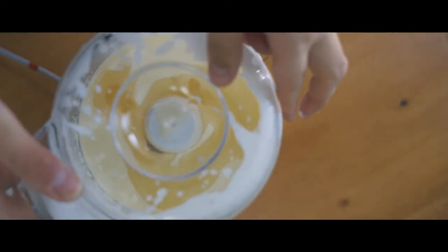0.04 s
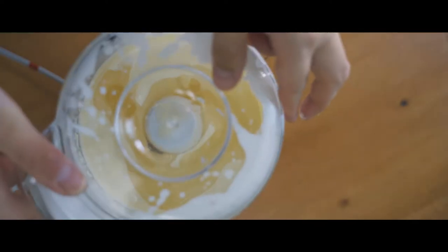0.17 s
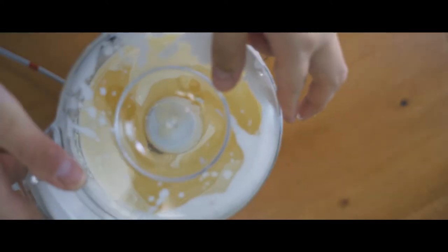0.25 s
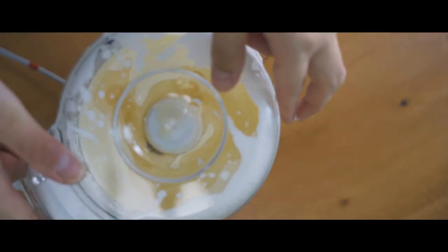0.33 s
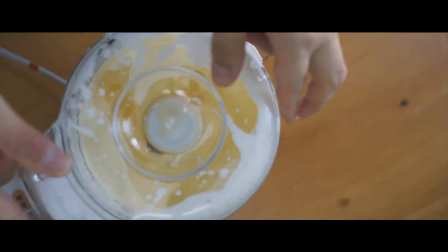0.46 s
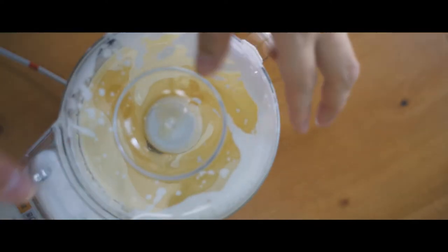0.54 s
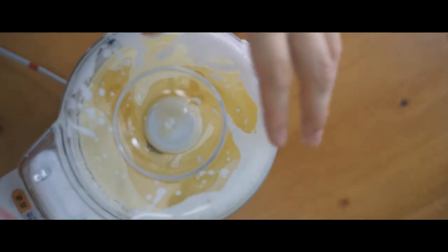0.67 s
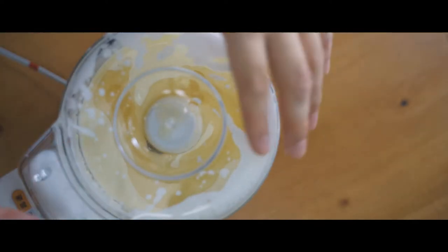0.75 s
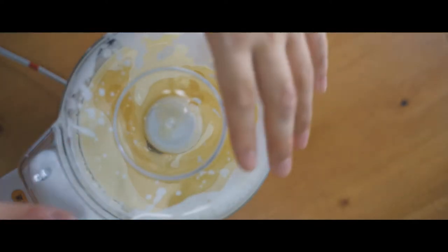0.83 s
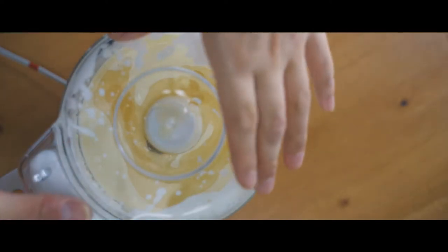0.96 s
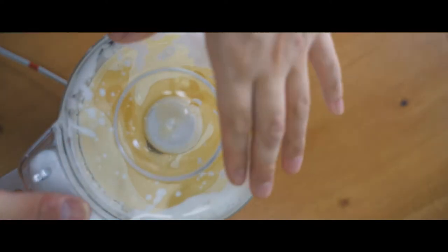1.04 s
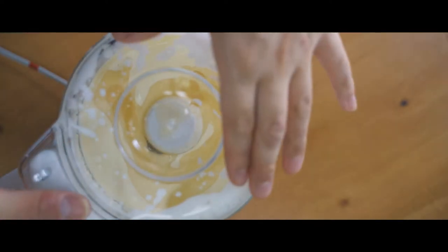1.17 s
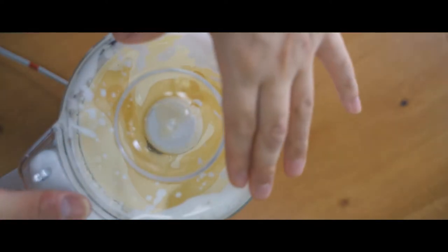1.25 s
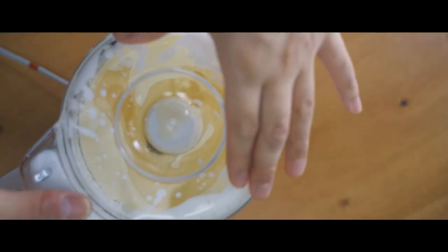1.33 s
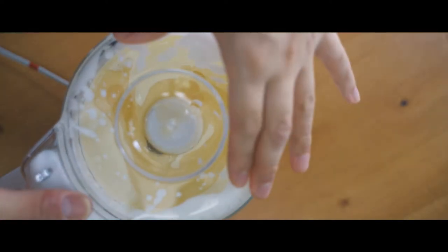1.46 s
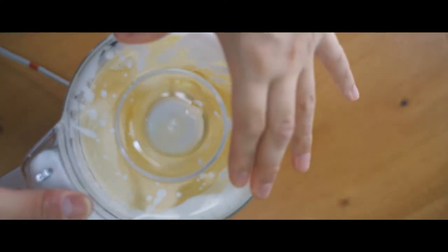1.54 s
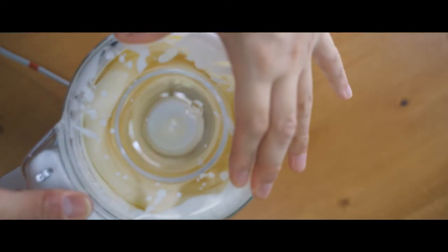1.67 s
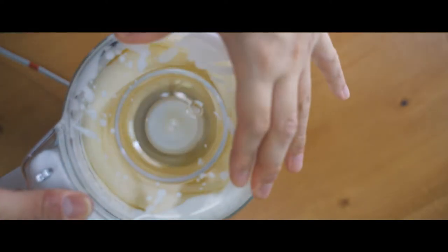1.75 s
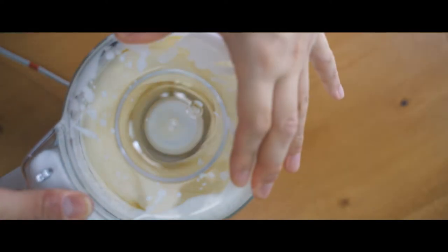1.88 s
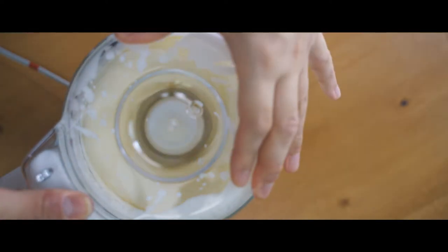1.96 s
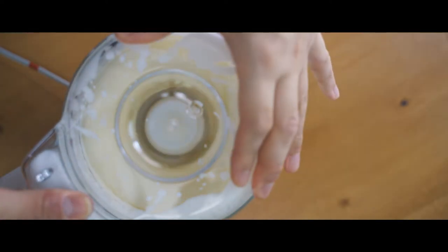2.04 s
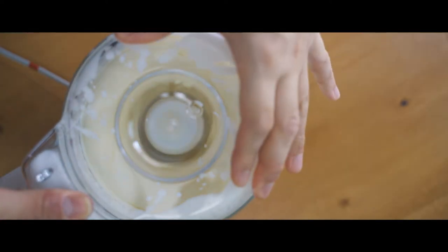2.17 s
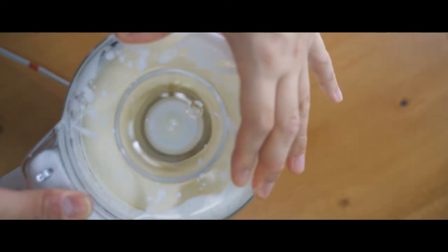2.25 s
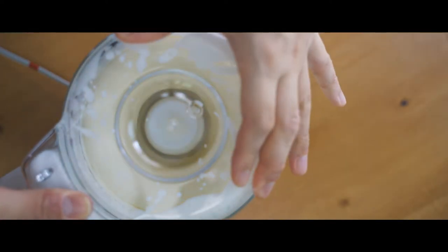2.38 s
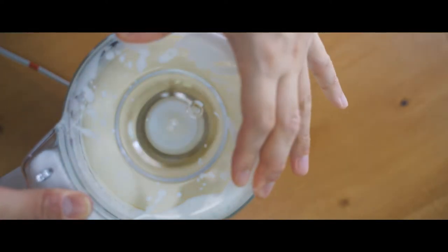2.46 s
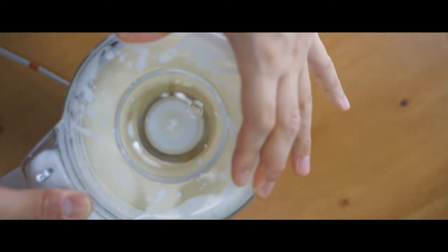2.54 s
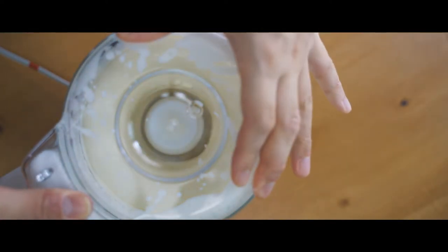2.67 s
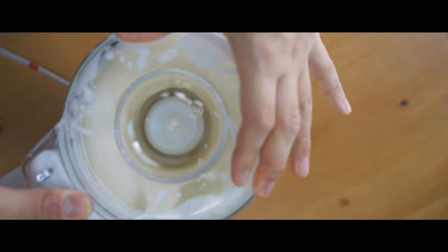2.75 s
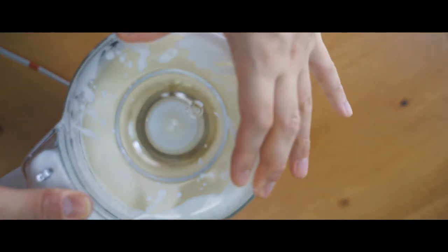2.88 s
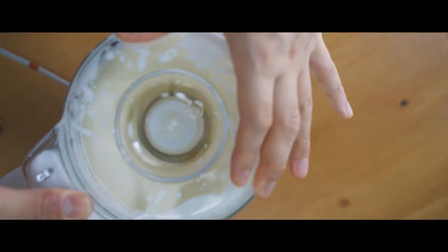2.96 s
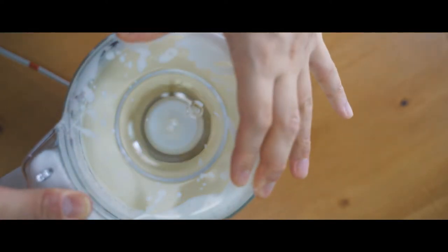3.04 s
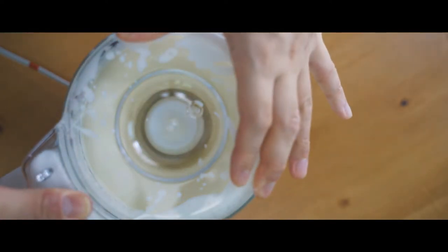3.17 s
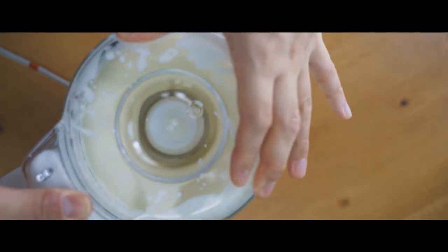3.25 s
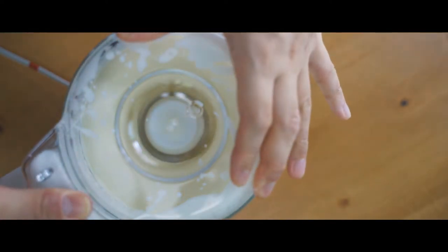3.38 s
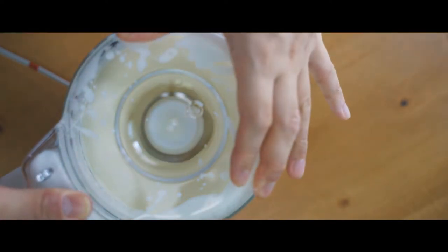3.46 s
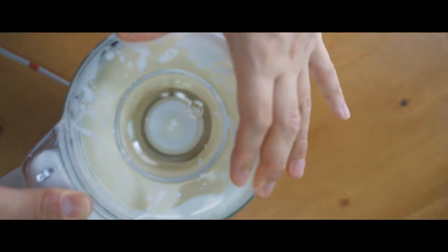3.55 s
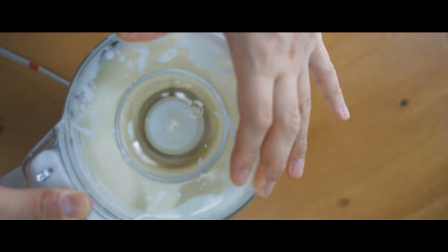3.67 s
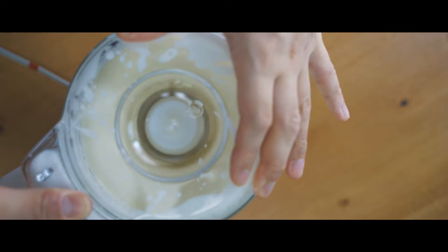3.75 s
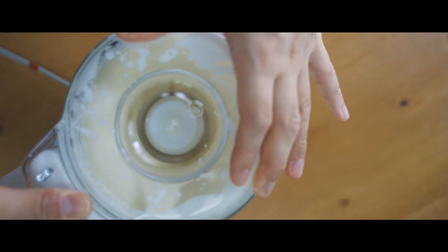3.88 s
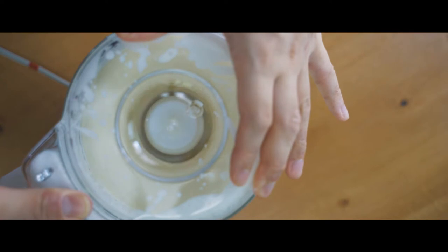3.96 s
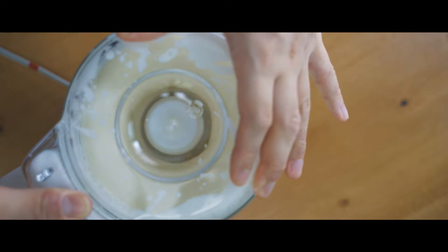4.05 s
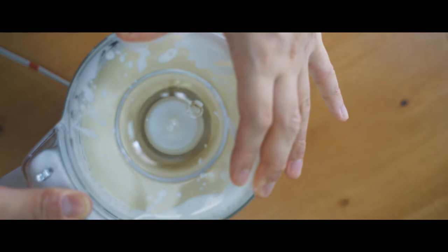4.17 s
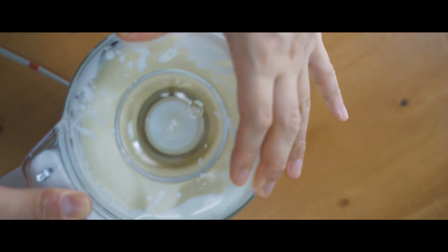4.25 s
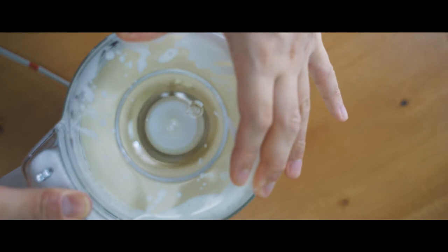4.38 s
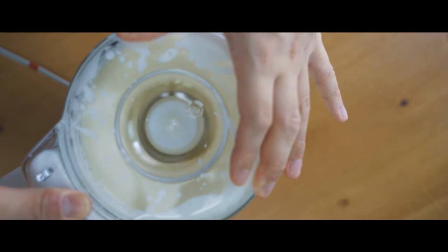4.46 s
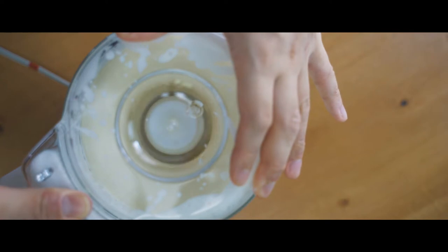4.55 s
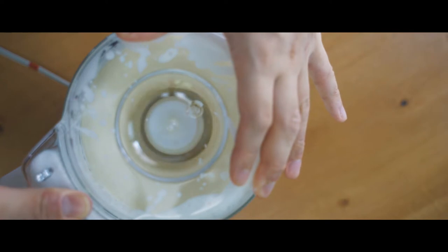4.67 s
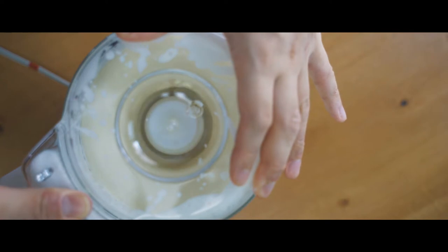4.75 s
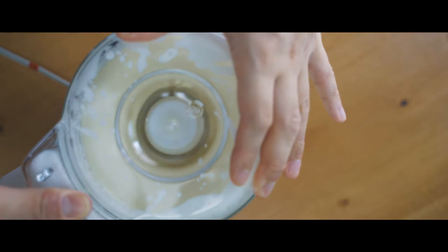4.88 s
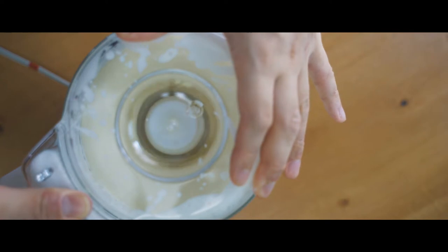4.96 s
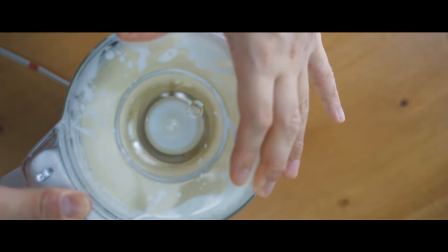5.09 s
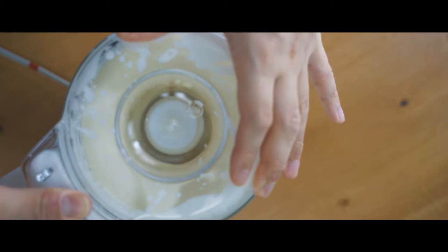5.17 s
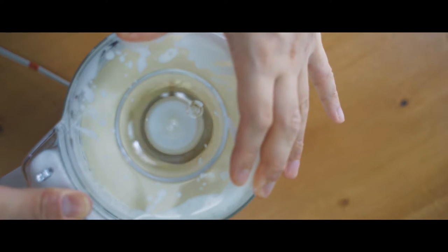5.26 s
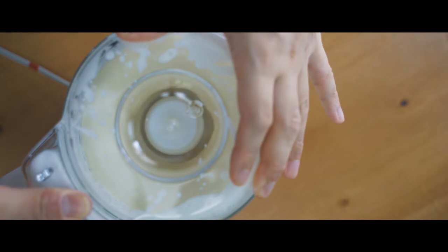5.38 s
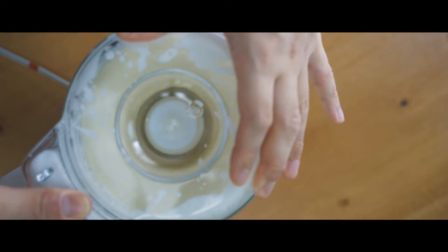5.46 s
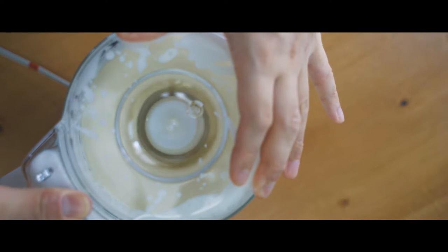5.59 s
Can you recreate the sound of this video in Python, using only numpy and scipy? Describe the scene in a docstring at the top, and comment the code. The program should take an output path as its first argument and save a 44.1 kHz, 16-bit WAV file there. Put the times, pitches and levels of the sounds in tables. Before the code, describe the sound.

Near stereo pickup of plastic and motor in a small, lightly reflective room. First soft taps and short rasping rubs, then a dense clatter as the lid twists home. Near-quiet follows, with a few light ticks. A firm click starts the machine: a thump of hum, a gritty surge, then a hard nasal whine with fast electrical buzz, brushy hiss and wet rattling churn, running without a stop.

```python
"""Food processor on a kitchen table

Heard by two microphones just above: the lid rubs and knocks as it is twisted to its latch, then the motor starts.
Fed one half of each mains cycle, it throbs fifty times a second: rotor tones whine, shaped noise rattles and hisses.
It spins up quickly, then gains speed slowly as the batter thins; mains harmonics make the stator's hum.
A small room answers with sparse reflections over still air and a low hum; struck plastic is decaying sines and noise."""
import sys
import numpy as np
from scipy import signal
from scipy.fft import rfft, irfft
from scipy.io import wavfile

SR = 44100
rng = np.random.default_rng(int(sys.argv[2]) if len(sys.argv) > 2 else 0)


def materialize(psi):
    """Save the field psi as 16-bit PCM at rate SR to the path in sys.argv[1].

    A 1-D psi becomes a single channel; in a 2-D psi each row is a channel.
    """
    bounded = np.clip(np.atleast_2d(psi).T, -1, 1)
    quanta = np.round(bounded * 32767).astype(np.int16)
    wavfile.write(sys.argv[1], SR, quanta)


N = 247842
TIME = np.arange(N) / SR  # s
BINS = np.fft.rfftfreq(N, 1 / SR)  # Hz

# Still air of the quiet kitchen. Each row: frequency in Hz, relative density in dB per Hz.
AIR_SPECTRUM = [(15, -44), (25, -19), (69, -15.5), (122, -6.5), (215, -9), (233, 0), (281, -1.5),
                (331, -22), (368, 2.5), (410, -19.5), (567, -13), (684, -20), (741, -15), (2300, -31),
                (15500, -44.5)]
# Faint hum of the kitchen. Each row: frequency in Hz, peak level in dB.
ROOM_HUM_TONES = [(279.9, -60), (371.4, -68.5), (559.9, -69.5), (737.5, -81.5)]
# Decay of the kitchen. Each row: frequency in Hz, time to fall 60 dB in s.
ROOM_DECAY = [(150, 0.19), (1000, 0.25), (4000, 0.2), (14000, 0.16)]
# Likeness of the noise at the two microphones. Each row: frequency in Hz, likeness 0-1.
MICROPHONE_LIKENESS = [(105, .99), (160, .1), (300, .55), (500, .85), (800, .8), (2000, .4), (5000, .15),
                       (12000, .05)]
# The lid rubbing round its rim. Each row: start in s, length in s, level in dB before the grip shapes it,
# lid mode rubbed hardest in Hz.
LID_RUBS = [(0.039, 0.099, -60.5, 970), (0.383, 0.16, -47, 4480), (0.447, 0.12, -38, 1720)]
# Ring of the plastic lid. Each row: mode in Hz, level in dB before a touch favours it, time to fall 60 dB in s.
LID_MODES = [(610, -13, 0.089), (944, -6.5, 0.14), (1000, -5.5, 0.064), (1628, -5.5, 0.069),
             (1716, 2.5, 0.049), (2100, 4, 0.015), (2446, -5.5, 0.044), (2900, -19, 0.024),
             (3660, -27, 0.038), (3970, -3, 0.032), (4240, 1, 0.027), (4530, -2, 0.038), (4840, -8, .04),
             (5220, -10.5, 0.059), (6780, -7, .05), (7500, -27, 0.055)]
# Knocks of lid, latch, switch and lumps. Each row: start in s, hollow pitch in Hz, relative levels in dB of the
# hollow note, mid ring, crack and edge, lid mode struck hardest in Hz.
KNOCK_EVENTS = [(.157, 424, -34, -36, -40, -52.5, 940), (.297, 372, -51.5, -56, -55, -71, 4180),
                (0.369, 533, -43, -29.5, -37, -62, 1630), (.400, 261, -42.5, -34.5, -35, -62, 2100),
                (.418, 280, -53, -60, -46, -51, 4480), (0.4419, 252, -42, -38.5, -45, -56, 2130),
                (.456, 254, -34.5, -33, -31, -52, 4180), (.553, 250, -39, -43.5, -62, -72, 990),
                (1.273, 225, -54, -57, -46, -54, 3750), (1.282, 275, -51, -53, -46, -50, 6000),
                (1.346, 287, -53, -56, -56, -62, 1900), (1.54, 440, -46, -30, -48, -59, 2120),
                (1.551, 455, -36, -33, -42, -71, 1720), (1.785, 660, -45.5, -44, -48, -64, 1630),
                (1.936, 443, -52, -54, -43.5, -68, 5220), (2.112, 440, -62, -46, -45, -62, 5220)]
# Tones of the rotor. Each row: multiple of the shaft speed (rounded in use), relative level in dB,
# share that throbs 0-1, place of the throb in mains cycles, roughness 0-1, left over right in dB.
ROTOR_TONES = [(6, -17, 0.69, 0.44, 0.35, 6), (20, -13.5, 0.37, 0.39, 0.64, 2),
               (24, -3, 0.98, 0.16, 0.04, 3), (29, -21.5, 0.6, 0.39, 0.6, -9),
               (30, -26.5, 0.6, .2, 0.54, 19.5), (48, -10, 0.9, 0.18, 0.26, 5.5),
               (72.2, -18, 0.64, 0.036, 0.43, 0), (96, -19.5, 0.1, 0.85, 0.2, -0.5),
               (120.6, -26, 0, 0.09, .8, -1.5), (145.4, -36.5, 0.1, .1, 0.85, -5),
               (192, -31, .2, .1, 0.95, 3)]
# Resonances of housing and bowl, which swell the whine as it climbs through them.
# Each row: frequency in Hz, width in Hz, level in dB over the plain wall.
HOUSING_MODES = [(370, 56, 5), (451.5, 11, 4), (536, 59, 5.5), (735, 31, 2), (1022.3, 14, 8.5),
                 (1568.5, 17, 6), (1698.6, 27.5, 3.5), (1848, 99, 5), (2060, 39, -3), (2490, 134, -6),
                 (3294, 12, -6), (3344, 12, -2), (3380, 14, -3), (3505, 12, 3.5), (5141, 60, 0),
                 (5320, 20, -1)]
# Hum of the stator once settled. Each row: multiple of the mains, rms level in dB.
STATOR_HUM = [(1, -90), (2, -54), (3, -62.5), (4, -62.5), (5, -65.5), (6, -52.5), (7, -57), (8, -58.5),
              (9, -50.5), (11, -57), (12, -55.5), (13, -70.5), (15, -59.5)]
# The drive grinding as it takes up the load. Each row: frequency in Hz, relative density in dB per Hz.
GRIND_SPECTRUM = [(45, -25), (85, 2), (140, 2), (250, 5), (450, -6), (900, -8), (1300, 0), (2000, 7.5),
                  (2500, -1), (3100, -7), (3700, -2.5), (4300, -7.5), (5200, -18), (16000, -57)]
# Gears and blade in the batter, before the housing. Each row: frequency in Hz, relative density in dB per Hz.
CHURN_SPECTRUM = [(25, -34), (68, -31), (95, -23), (170, -24), (270, -7), (400, 0.5), (560, -6), (660, -5),
                  (1000, 0), (1400, -10.5), (2200, -11), (4000, -17.5), (16000, -49)]
# Brushes and cooling air, before the housing. Each row: frequency in Hz, relative density in dB per Hz.
BRUSH_SPECTRUM = [(200, 6.5), (900, 5), (1500, 23.5), (2000, 18), (2800, 7.5), (4400, 3), (5800, -1.5),
                  (6700, 5), (7600, -1), (9800, -2), (11000, -8.5), (12500, -7.5), (13400, -7), (15700, -8)]

MAINS_HZ = 50.04
SLOTS = 24  # rotor slots per turn
SWITCH_ON = 1.541  # s
# Slots pass at THICK_HZ in thick batter, reached with this time constant (s)
THICK_HZ, SPIN_UP_S = 1650, 0.097
# From THINS_AT (s) the batter thins; half the gain towards FREED_HZ is made after THINS_HALF_S
THINS_AT, THINS_HALF_S, FREED_HZ = 2.3, 1.55, 110


def gain_of(db):
    """Decibels to amplitude."""
    return 10 ** (np.asarray(db) / 20)


def evened(x):
    """Scales to rms 1."""
    return x / np.sqrt(np.mean(x ** 2) + 1e-20)


def read(points, hz):
    """Reads a curve whose points are joined on a log-frequency axis."""
    f, value = np.transpose(points)
    return np.interp(np.log(hz + 1), np.log(f + 1), value)


def panned(x, left_db):
    """Leans a sound to the left microphone."""
    return x * gain_of([[left_db / 2], [-left_db / 2]])


def wander(hz):
    """Smooth chance of rms 1, mostly below the given rate."""
    return evened(irfft(rfft(rng.standard_normal(N)) / (1 + (BINS / hz) ** 4), N))


def noise(spectrum):
    """Coloured noise at two microphones, most alike in the lowest bass."""
    left, other = rfft(rng.standard_normal((2, N)))
    same = read(MICROPHONE_LIKENESS, BINS)
    right = same * left + np.sqrt(1 - same ** 2) * other
    return evened(irfft(np.array([left, right]) * gain_of(read(spectrum, BINS)), N))


def band_passed(x, band):
    """Keeps one band (low Hz, high Hz)."""
    return signal.sosfilt(signal.butter(3, band, "bandpass", fs=SR, output="sos"), x)


def kitchen(x, wet_db):
    """Adds sparse reflections, different at each microphone, the top treble dying first."""
    taps = rng.standard_normal((2, SR // 2)) * (rng.random((2, SR // 2)) < 0.1)
    taps[:, :SR // 400] = 0  # no reflection in the first 2.5 ms
    hz, t, z = signal.stft(taps, SR, nperseg=256)
    decay = gain_of(-60 * t / read(ROOM_DECAY, hz)[:, None])
    tail = signal.istft(z * decay, SR, nperseg=256)[1]
    tail /= np.linalg.norm(tail, axis=1, keepdims=True)
    return x + gain_of(wet_db) * signal.fftconvolve(x, tail, axes=1)[:, :N]


def background(air_db=-49.5):
    """Still air as shaped noise, and a faint hum whose phase wavers."""
    tones = 0
    for hz, db in ROOM_HUM_TONES:
        tones = tones + gain_of(db) * np.cos(2 * np.pi * hz * TIME + 1.1 * wander(hz=4.5))
    return gain_of(air_db) * noise(AIR_SPECTRUM) + tones


def nearness(hz, touched_hz, spread=0.052):
    """How strongly a touch favours a mode of the lid, 0-1; spread is in log frequency."""
    return np.exp(-(np.log(hz / touched_hz) / spread) ** 2)


def twist(slips_per_s=1800, favour_db=7, grip_rise=0.015):
    """Tiny slips of plastic on plastic keep the lid ringing; each rub grips quickly and eases off."""
    out, t = np.zeros((2, N)), np.arange(SR // 8) / SR
    for start, length, rub_db, rubbed_hz in LID_RUBS:
        slips = rng.standard_normal((2, N)) * (rng.random(N) < slips_per_s / SR)
        ring = 0
        for hz, db, t60 in LID_MODES:
            level_db = db + favour_db * nearness(hz, rubbed_hz)
            ring = ring + gain_of(level_db - 60 * t / t60) * np.sin(2 * np.pi * hz * t)
        ringing = signal.oaconvolve(slips, ring[None])[:, :N]
        rasp = band_passed(slips, [1500, 8500])
        rub = evened(ringing) + evened(rasp)
        easing = np.clip(1 - (TIME - start) / length, 0, 1)
        grip = np.clip((TIME - start) / grip_rise, 0, 1) * easing
        out += gain_of(rub_db) * evened(rub) * grip
    return out


def lid_blow(t, struck_hz, crack_t60=0.065, crack_db=-1, snap_t60=0.018, snap_db=7, favour_db=9):
    """A blow sets off a noisy crack, a shorter snap of contact and the decaying modes of the lid."""
    crack = gain_of(crack_db - 60 * t / crack_t60) * rng.standard_normal((2, len(t)))
    snap = gain_of(snap_db - 60 * t / snap_t60) * rng.standard_normal((2, len(t)))
    ring = crack + snap
    for hz, db, t60 in LID_MODES:
        level_db = db + favour_db * nearness(hz, struck_hz)
        phase = rng.normal(0, 1.0, (2, 1))  # differs at each microphone
        ring += gain_of(level_db - 60 * t / t60) * np.sin(2 * np.pi * hz * t + phase)
    return ring


def knocks(hollow_t60=0.1, hollow_rise=0.003, contact=0.00082, knock_db=-0.5):
    """Each blow gives a hollow note of the bowl, a short crack and the ring of the lid, by where it lands."""
    out, t = np.zeros((2, N)), np.arange(SR // 4) / SR
    bands = [(500, 2900), (2900, 8500), (8500, 13000)]  # mid ring, crack and edge, Hz
    for start, hollow_hz, hollow_db, *band_dbs, struck_hz in KNOCK_EVENTS:
        ring = lid_blow(t, struck_hz)
        hollow = gain_of(-60 * t / hollow_t60) * np.sin(2 * np.pi * hollow_hz * t)
        hollow = hollow * np.minimum(t / hollow_rise, 1) * np.ones((2, 1))
        parts = [hollow] + [band_passed(ring, band) for band in bands]
        blow = 0
        for db, part in zip([hollow_db] + band_dbs, parts):
            blow = blow + gain_of(db) * part / np.std(part[:, :SR // 50])  # level over the first 20 ms
        first = round(start * SR)
        out[:, first:first + len(t)] += blow * np.minimum(t / contact, 1)
    return gain_of(knock_db) * out


def powered(rise):
    """Zero until the switch closes, then rising to one over the given seconds."""
    return np.clip((TIME - SWITCH_ON) / rise, 0, 1)


def since_switch():
    """Seconds since the switch closed, zero before."""
    return np.maximum(TIME - SWITCH_ON, 0)


def throb(share, place, sharpness=2.55):
    """One smooth pulse of current in each mains cycle, over a steady part."""
    pulse = np.exp(sharpness * (np.cos(2 * np.pi * (TIME * MAINS_HZ - place)) - 1))
    return evened(1 - share + share * pulse)


def slot_rate():
    """Slots passing per second: a quick spin-up, then a slow gain as the batter thins."""
    spun_up = 1 - np.exp(-since_switch() / SPIN_UP_S)
    mixing = (np.maximum(TIME - THINS_AT, 0) / THINS_HALF_S) ** 2
    return spun_up * (THICK_HZ + FREED_HZ * mixing / (1 + mixing))


def shaft_turns(surge=0.0027, jitter=0.00017):
    """Shaft angle in turns: each current pulse nudges it ahead, and it has a little play."""
    turns = np.cumsum(slot_rate()) / SR / SLOTS
    nudge = surge * np.sin(2 * np.pi * (TIME * MAINS_HZ - 0.3))
    return turns + nudge + jitter * wander(hz=131)


def housing(x):
    """The plain wall passes everything; its resonances ring on top."""
    response = 1
    for hz, width, db in HOUSING_MODES:
        response = response + gain_of(db) / (1 + 2j * (BINS - hz) / width)
    return irfft(rfft(x) * response, N)


def whine(turns, blur_hz=190, brightening=0.75, strain_db=8, strain_s=0.18, whine_db=-32.5):
    """Throbbing rotor tones, each roughened by chance; the high ones only come out at speed."""
    speed = slot_rate() / (THICK_HZ + FREED_HZ)
    # the blade breaking the batter loose: hardest strain_s after the switch
    age = since_switch() / strain_s
    strain = age * np.exp(1 - age)
    tones = 0
    for order, db, share, place, rough, left_db in ROTOR_TONES:
        order = round(order)
        blur = (wander(blur_hz) + 1j * wander(blur_hz)) / np.sqrt(2)
        # short waves reach the two microphones out of step
        paths = rng.random((2, 1)) if order > 2 * SLOTS else rng.random()
        carrier = np.exp(2j * np.pi * (order * turns + paths))
        tone = (carrier * (np.sqrt(1 - rough ** 2) + rough * blur)).real
        tone *= speed ** (brightening * order / SLOTS)
        if order in (2 * SLOTS, 3 * SLOTS):  # second and third harmonics of the slot tone
            tone *= gain_of(strain_db * strain)
        tones = tones + panned(gain_of(db) * throb(share, place) * tone, left_db)
    sound = housing(tones * powered(rise=0.2))
    running_level = np.std(sound[:, 2 * SR:])  # from 2 s on
    return gain_of(whine_db) * sound / running_level * powered(rise=0.02)


def panel(turns, hz=2011, width_hz=30, panel_db=-49):
    """The sharp edge of each current pulse rings one panel, most when the pulses arrive in step with it."""
    edge = throb(share=1, place=0.1, sharpness=28)
    kicks = edge * np.cos(2 * np.pi * SLOTS * turns) * gain_of(2 * wander(hz=60)) * powered(rise=0.02)
    ring = irfft(rfft(kicks) / (1 + 2j * (BINS - hz) / width_hz) ** 2, N)
    return gain_of(panel_db) * evened(ring) * powered(rise=0.01)


def hum(inrush_db=7, settle=0.037):
    """The stator hums on the mains, hardest at the start; the room sets its upper tones out of step."""
    inrush = gain_of(inrush_db * np.exp(-since_switch() / settle))
    lines = 0
    for multiple, db in STATOR_HUM:
        side = rng.choice([-1, 1]) * np.array([[1], [-1]])
        offset = 0.45 * (multiple > 2.5) * side  # radians, opposite at the two microphones
        phase = 2 * np.pi * (round(multiple) * MAINS_HZ * TIME + rng.random())
        lines = lines + gain_of(db) * np.cos(phase + offset)
    return np.sqrt(2) * lines * inrush * powered(rise=0.0092)


def jolt(hz=96, rock_db=-34, rock_t60=0.61, grind_db=-34, grind_t60=1.9):
    """The starting torque rocks the machine on its feet and grinds the slack drive in bursts."""
    t = since_switch()
    swing = np.sin(2 * np.pi * hz * t + 0.5 * wander(hz=31))
    rock = gain_of(rock_db - 60 * t / rock_t60) * swing * powered(rise=0.02)
    bursts = throb(share=0.65, place=0.29, sharpness=1.6)
    uneven_db = 2.6 * wander(hz=300)
    grind = gain_of(grind_db - 60 * t / grind_t60 + uneven_db) * noise(GRIND_SPECTRUM) * bursts
    return rock + grind * powered(rise=0.0031)


def churn(lumps_db=-1.0, churn_db=-42.5):
    """Gears and blade rattle through the batter just after each push of the motor."""
    pushes = throb(share=0.4, place=0.46, sharpness=1.0)
    rattle = noise(CHURN_SPECTRUM) * pushes * gain_of(lumps_db * wander(hz=45))
    return panned(evened(housing(rattle)), left_db=1.0) * gain_of(churn_db) * powered(rise=0.0097)


def brushes(sparks_db=1.0, standstill_db=-7, brushes_db=-37):
    """Brushes scrape the commutator, louder with speed, and spark unevenly."""
    pulses = throb(share=0.16, place=0.22, sharpness=2.2)
    hiss = noise(BRUSH_SPECTRUM) * pulses * gain_of(sparks_db * wander(hz=200))
    slowness = 1 - slot_rate() / THICK_HZ
    return evened(housing(hiss)) * gain_of(brushes_db + standstill_db * slowness) * powered(rise=0.01)


def scene():
    """Lid and machine in the kitchen; the reflections are added to lid, whine and panel."""
    turns = shaft_turns()
    room = panned(background(), left_db=1.0)
    lid = kitchen(twist() + knocks(), wet_db=-2.5)
    ringing_motor = kitchen(whine(turns) + panel(turns), wet_db=-6.0)
    return room + lid + ringing_motor + hum() + jolt() + churn() + brushes()


def record(dry, right_lag=3, low_cut_hz=36, edge_hz=15750):
    """Sound reaches the right microphone right_lag samples late; then the low cut and the upper band limit."""
    pair = np.array([dry[0], np.pad(dry[1], (right_lag, 0))[:N]])
    pair = signal.sosfilt(signal.butter(2, low_cut_hz, "highpass", fs=SR, output="sos"), pair)
    band_limit = signal.firwin(1023, edge_hz, window=("kaiser", 9), fs=SR)
    return signal.oaconvolve(pair, band_limit[None], "same")


dry = scene()
out = record(dry)
materialize(out)
```